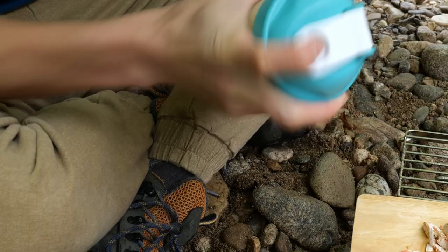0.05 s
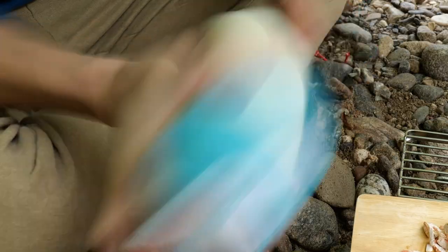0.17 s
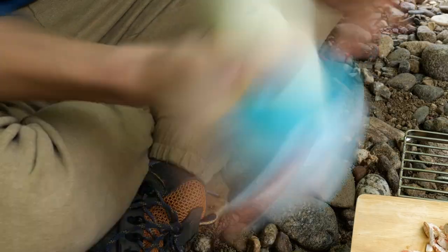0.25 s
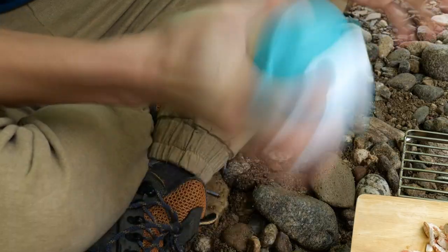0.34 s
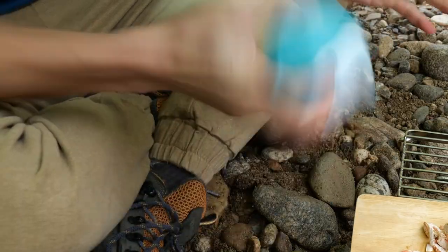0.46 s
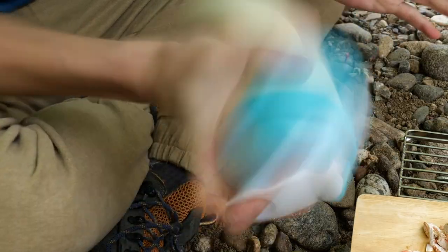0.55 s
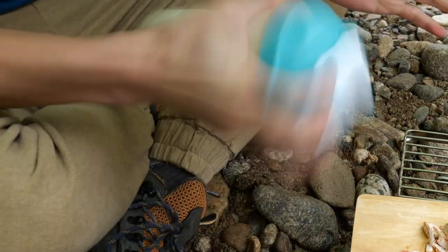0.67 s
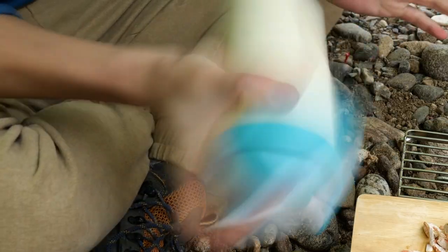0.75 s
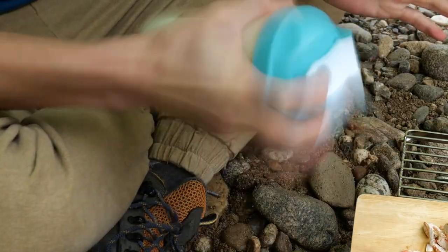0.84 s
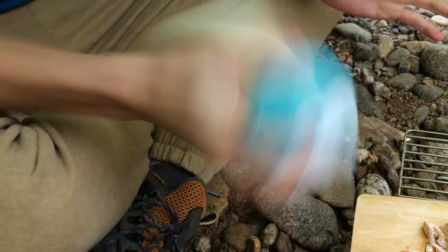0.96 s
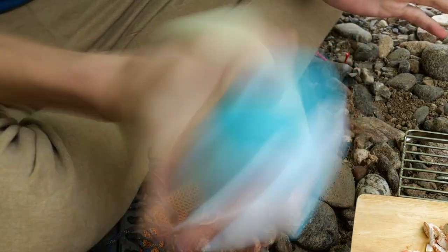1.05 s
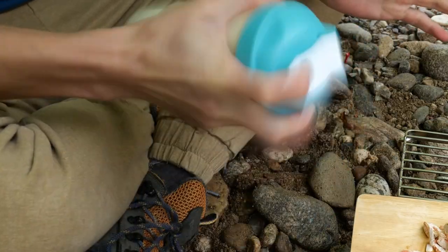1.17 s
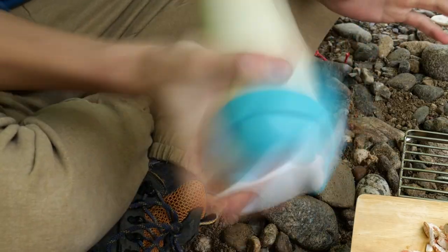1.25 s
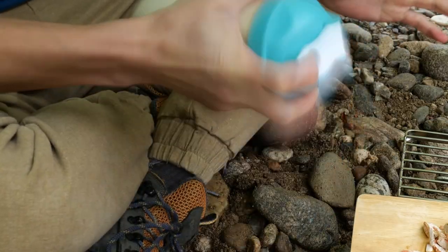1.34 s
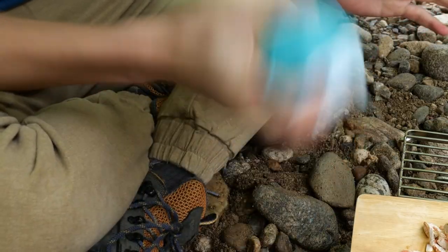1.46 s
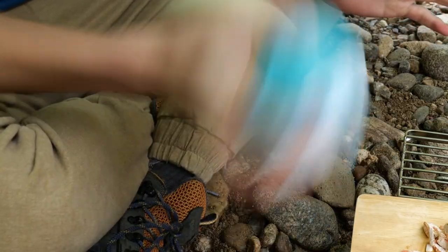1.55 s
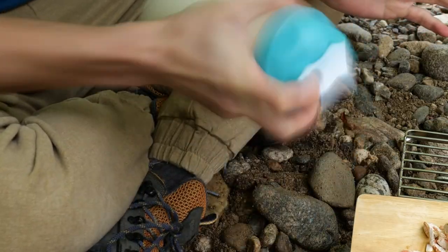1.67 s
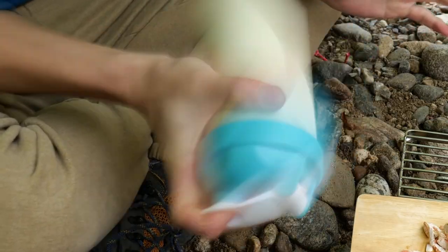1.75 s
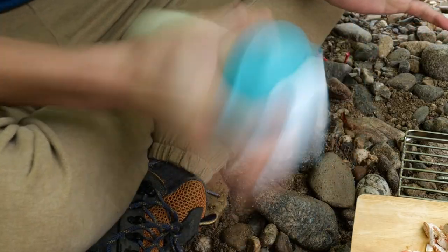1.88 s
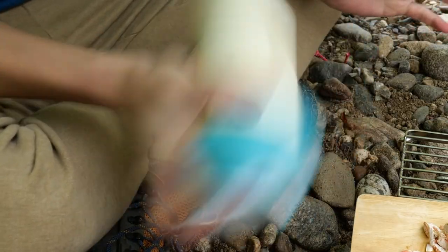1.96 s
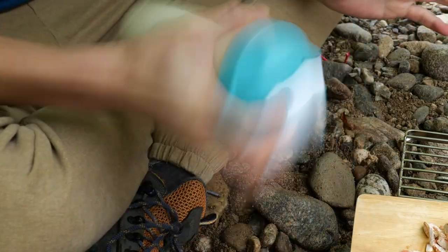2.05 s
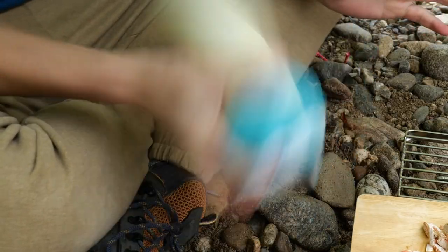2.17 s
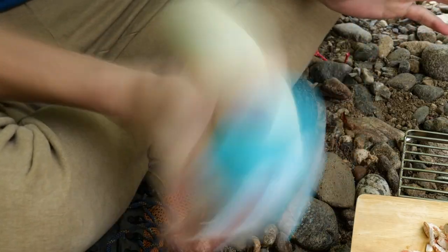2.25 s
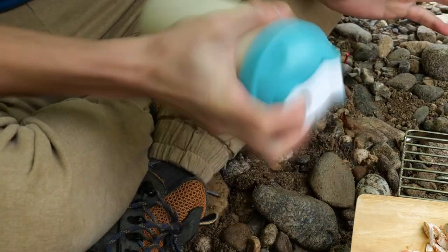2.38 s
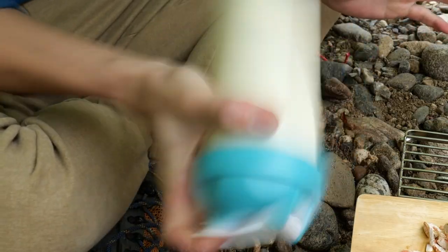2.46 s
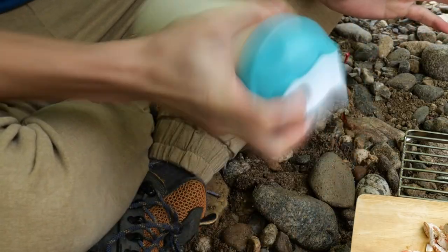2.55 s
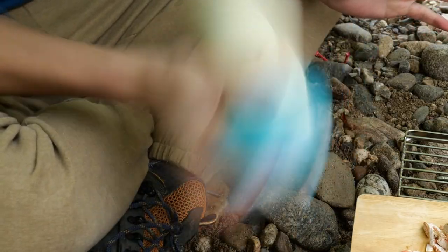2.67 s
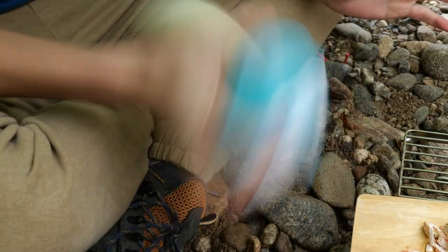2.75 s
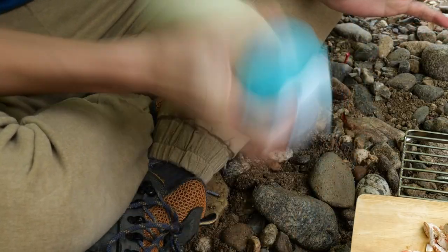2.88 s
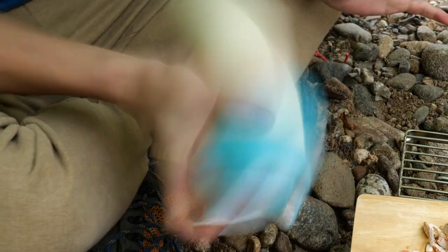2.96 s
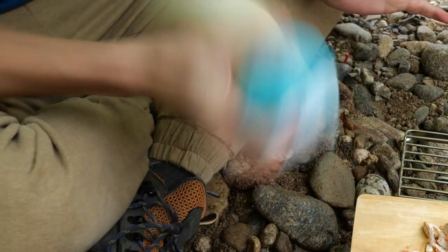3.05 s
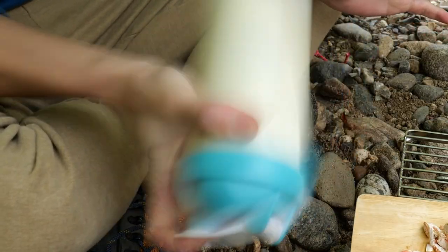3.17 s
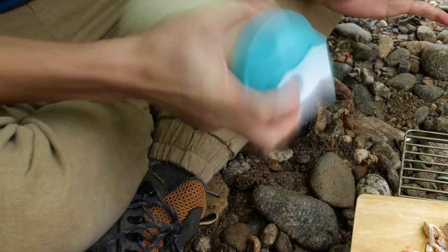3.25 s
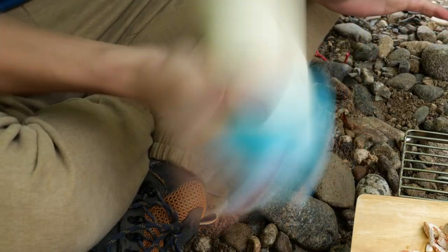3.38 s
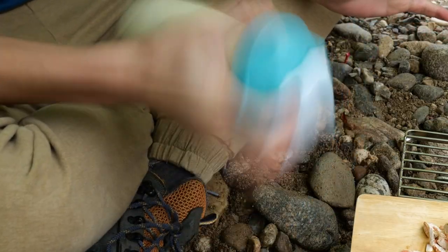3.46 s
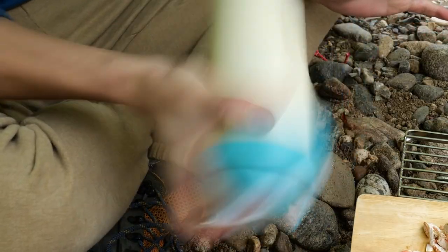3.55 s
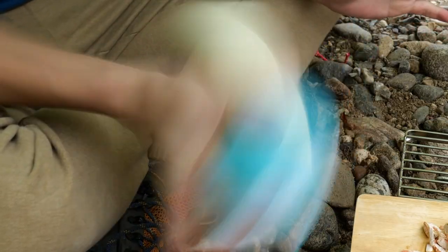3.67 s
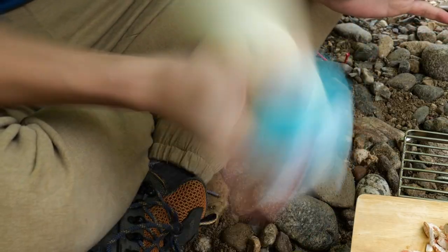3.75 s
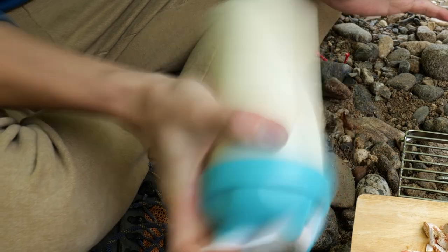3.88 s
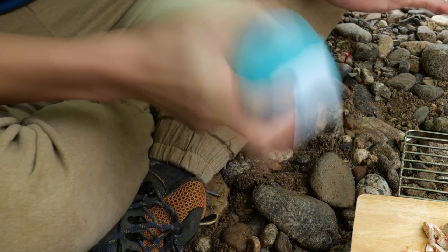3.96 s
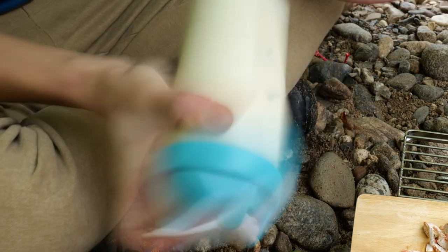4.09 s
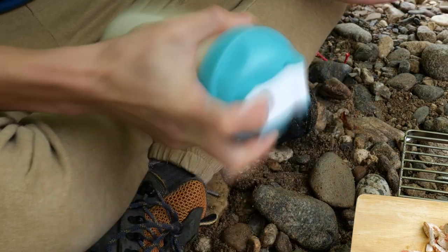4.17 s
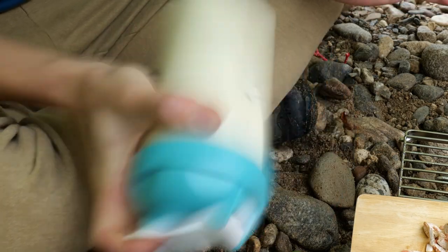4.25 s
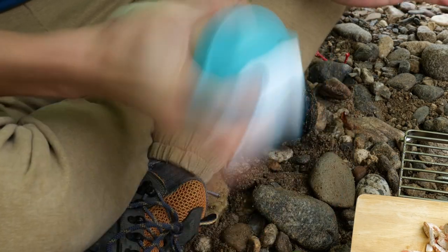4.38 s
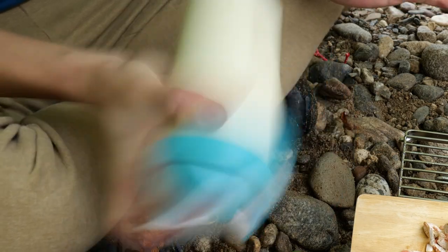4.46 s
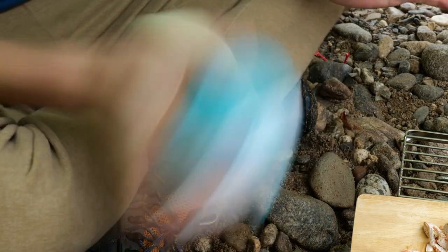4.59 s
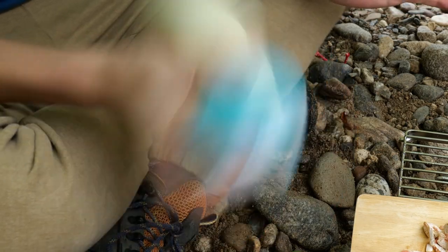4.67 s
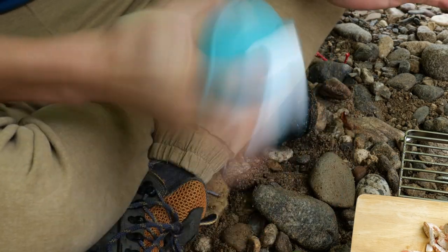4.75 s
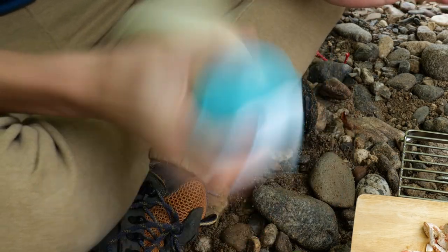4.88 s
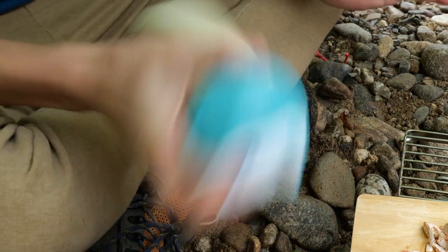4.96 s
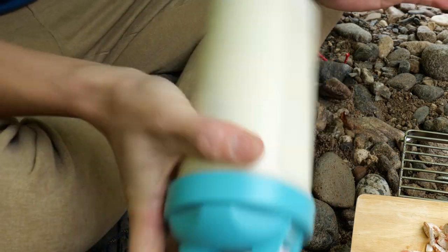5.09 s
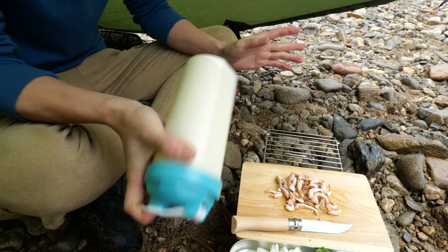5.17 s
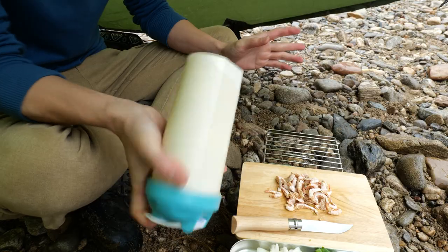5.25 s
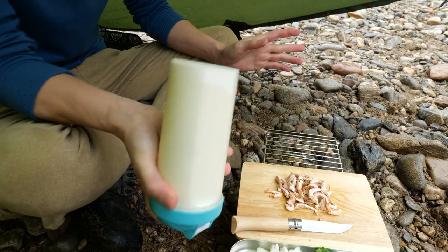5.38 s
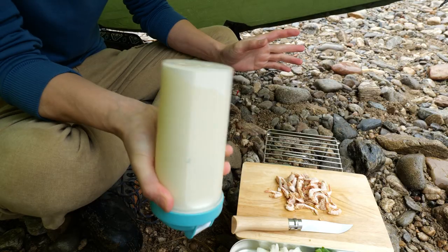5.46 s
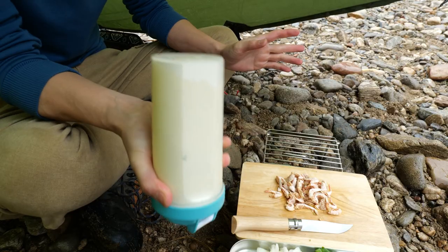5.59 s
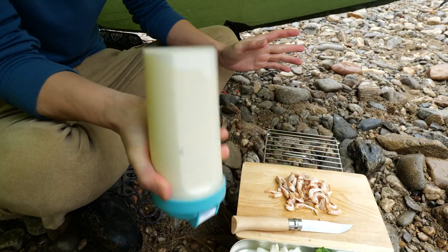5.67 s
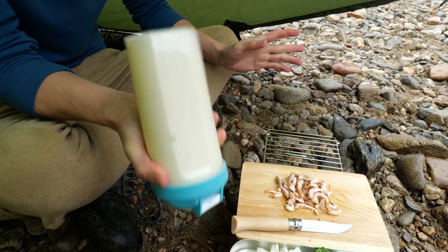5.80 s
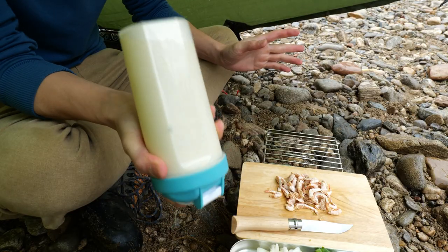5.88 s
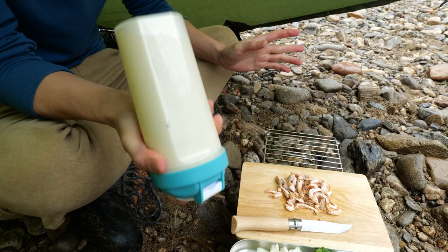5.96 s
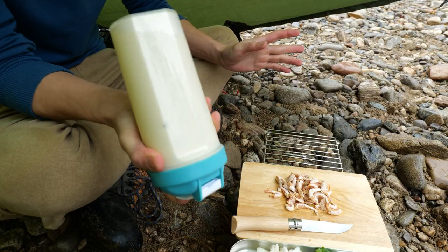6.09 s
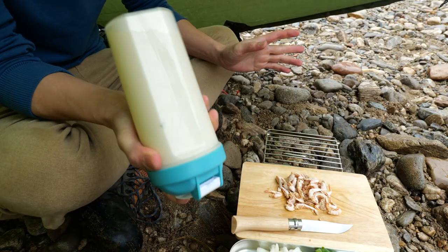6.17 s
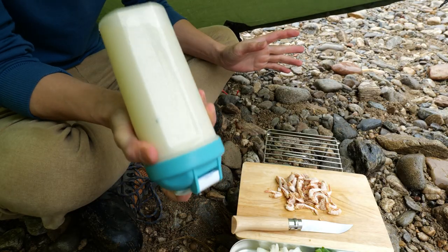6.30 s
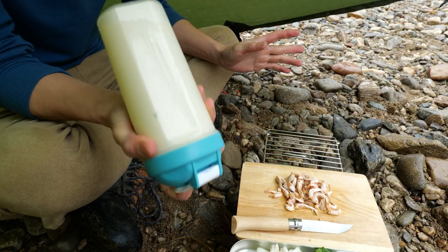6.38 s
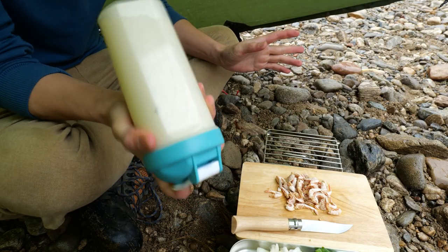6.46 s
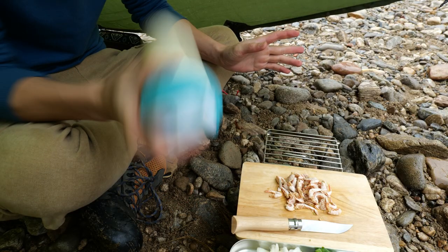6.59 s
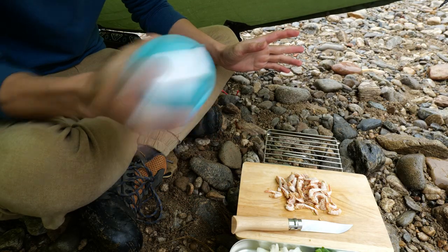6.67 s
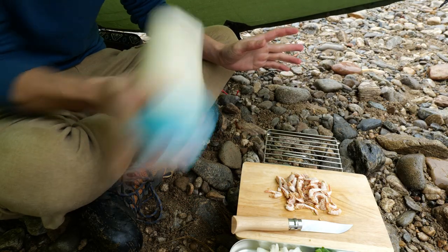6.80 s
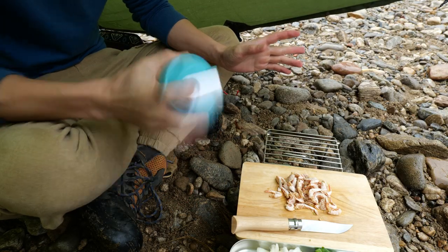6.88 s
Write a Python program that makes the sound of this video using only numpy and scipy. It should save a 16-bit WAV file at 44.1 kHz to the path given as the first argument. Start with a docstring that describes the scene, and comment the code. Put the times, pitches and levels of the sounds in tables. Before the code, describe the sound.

A plastic shaker bottle of creamy liquid is shaken hard close by, sloshing and rattling rapidly, then rests with faint drips before shaking restarts.

```python
"""Stony campsite: a plastic shaker bottle of creamy liquid is shaken hard by hand, close by.
Each stroke drives bubble clouds (damped sines plus noise) through the bottle: short throw, longer return.
Liquid, mixing ball and drips knock on the wall as noise slaps, wall modes and air-pocket tones.
The bottle rests with a few drips, then starts again.
Cloth rustle, a soft rumble, faint ground scatter, a far hiss and a low hum are shaped noise and a sine."""
import sys
import numpy as np
from scipy import signal
from scipy.fft import rfft, irfft
from scipy.io import wavfile
from scipy.ndimage import map_coordinates

SR = 44100
rng = np.random.default_rng(int(sys.argv[2]) if len(sys.argv) > 2 else 0)


def put_to_file(sound):
    """Save the sound as 16-bit audio at rate SR, in the file named by the first command-line argument."""
    columns = np.atleast_2d(sound).T  # one column per channel
    safe = np.clip(columns, -1, 1)
    whole_steps = np.round(safe * 32767)
    wavfile.write(sys.argv[1], SR, whole_steps.astype(np.int16))


N = 305613
TIME_S = np.arange(N) / SR

# far outdoor hiss: (frequency [Hz], relative density [dB per Hz])
OUTDOORS_SPECTRUM = [(15, -59), (25, -4), (58, -14), (92, -3), (145, -15), (229, -7), (285, -20.5),
                     (317, -17.5), (405, -13), (1890, -19), (5730, -24.5), (14400, -52), (16000, -55)]
# rubbing cloth: (frequency [Hz], relative density [dB per Hz])
SLEEVE_SPECTRUM = [(200, -35), (500, 5), (1500, 9.5), (5000, 6), (8600, -5), (15000, -38)]
# arm movement: (time [s], rustle level [dB])
ARM_LEVEL = [(0, -48), (5.0, -46), (5.4, -56), (6.53, -75), (6.57, -51.5), (6.65, -48), (6.77, -53.5),
             (6.93, -49)]
# liquid mass pushing the bottle: (frequency [Hz], relative density [dB per Hz])
HEAVE_SPECTRUM = [(15, -5.5), (30, 0.5), (100, -5), (190, -2.5), (400, -12.5), (1500, -79)]
# force of the strokes: (time [s], heave level [dB])
SHAKING_LEVEL = [(0, -68), (.3, -43.5), (3.0, -48.5), (4.9, -46.5), (5.15, -67), (6.6, -68.5), (6.93, -41)]
# strokes: (throw time [s], throw level [dB], return time [s], return length [s], return level [dB])
STROKES = [(0.19, -58, 0.249, 0.036, -31.5), (0.348, -27, 0.417, 0.05, -24),
           (0.495, -25, 0.56, 0.09, -24.5), (0.692, -24.5, 0.755, 0.079, -24.5),
           (0.862, -25, 0.917, 0.063, -21.5), (1.017, -25.5, 1.092, 0.062, -22.5),
           (1.202, -25.5, 1.264, 0.065, -25), (1.378, -28, 1.431, 0.055, -23.5),
           (1.533, -25.5, 1.607, 0.089, -25), (1.722, -23.5, 1.768, 0.085, -24.5),
           (1.89, -24, 1.96, 0.063, -25.5), (2.07, -23, 2.129, 0.054, -21.5),
           (2.235, -27, 2.303, 0.059, -22.5), (2.427, -25.5, 2.494, 0.042, -20),
           (2.589, -24, 2.668, 0.043, -19.5), (2.766, -24.5, 2.832, 0.069, -23.5),
           (2.934, -23, 3.002, 0.075, -23.5), (3.124, -26, 3.19, 0.064, -22.5),
           (3.301, -23, 3.381, 0.061, -22.5), (3.481, -22, 3.55, 0.074, -24.5),
           (3.663, -21.5, 3.739, 0.056, -24.5), (3.838, -23.5, 3.91, 0.069, -24),
           (4.028, -21.5, 4.09, 0.096, -24), (4.207, -24.5, 4.281, 0.06, -20),
           (4.392, -23, 4.48, 0.079, -27), (4.584, -23.0, 4.652, 0.062, -21.0),
           (4.768, -25.5, 4.846, 0.059, -21), (4.935, -29.5, 4.98, 0.029, -29.5),
           (6.665, -61, 6.718, 0.025, -46), (6.785, -32.5, 6.861, 0.1, -32.5)]
# colour and fading of each surge: (gurgle re splash [dB], spray re splash [dB], fade [dB per s])
THROW_SHAPE = (-8, -5, 28)
RETURN_SHAPE = (-6, -1.2, 25)
# froth colour: (gurgle [dB], splash [dB], spray [dB])
FROTH_TONE_DB = (-2.5, 0, -3.5)
# bubbles through the wall: (frequency [Hz], relative density [dB per Hz])
SLOSH_SPECTRUM = [(30, -38.5), (115, -14), (300, -7), (540, -3), (1500, 2.5), (2400, -2), (3060, -1),
                  (3800, -3), (4750, -8.5), (5250, -7.5), (6000, -19.5), (8000, -23.5), (10200, -32.5),
                  (13000, -69)]
# finest spray: (frequency [Hz], relative density [dB per Hz])
MIST_SPECTRUM = [(3000, -19), (6500, 4), (8500, -0.5), (10500, -13), (12500, -25), (15000, -38)]
# liquid slapping plastic: (frequency [Hz], relative density [dB per Hz])
SLAP_SPECTRUM = [(40, -24), (140, -10), (300, -3), (1400, 0.5), (3200, -7.5), (5400, -7), (6200, -18.5),
                 (8500, -17), (11000, -33), (15000, -57)]
# bottle wall modes: (frequency [Hz], relative level [dB], t60 [s])
WALL_MODES = [(2770, -1.5, 0.015), (3064, 1.5, 0.024), (3264, 1, 0.021), (3527, -3.5, 0.036),
              (3950, -1, 0.024), (4470, 4.5, 0.011), (5205, -5.5, 0.033), (7160, -12, 0.05),
              (8250, -25, 0.012)]
# clearest knocks of liquid, ball and drips:
# (time [s], thud [dB], slap [dB], wall ring [dB], air pocket [Hz], most excited wall frequency [Hz])
KNOCKS = [(0.095, -31.5, -47, -49, 332, 4320), (0.194, -62, -41, -37, 870, 3940),
          (0.255, -17.5, -12, -16.5, 1480, 3080), (0.2762, -22, -37, -30.5, 302, 3000),
          (0.3491, -20.5, -15.5, -17.5, 306, 3390), (0.4503, -21.5, -23.0, -36, 478, 2700),
          (0.585, -31, -36, -25, 1450, 3060), (0.5889, -35, -33, -9, 1660, 3090),
          (0.7037, -29, -21.5, -31, 1420, 3430), (0.7402, -19.5, -14, -27, 1150, 2860),
          (0.8603, -25, -20.5, -19.5, 1320, 2670), (0.8793, -30, -18, -39, 766, 3300),
          (0.961, -25.5, -12, -7.5, 537, 3240), (1.0348, -22.5, -14.5, -51, 1270, 3100),
          (1.093, -53, -19, -40, 1478, 3720), (1.219, -25.5, -19, -24.5, 1370, 3970),
          (1.38, -24, -17, -24, 1300, 2780), (1.434, -45.5, -24.5, -23, 1710, 3250),
          (1.552, -29, -16.5, -20.5, 1490, 2900), (1.6546, -31, -26.5, -14.5, 1620, 3180),
          (1.6616, -40, -22.5, -15.0, 1560, 5280), (1.7258, -18.5, -17, -28.5, 758, 2680),
          (1.774, -32, -17.5, -21, 1780, 3520), (1.893, -23, -20, -28.5, 1340, 2660),
          (1.904, -23, -11.5, -28, 1320, 2710), (2.0157, -29.5, -23.5, -13.5, 1540, 5140),
          (2.0248, -31.0, -18.5, -28, 1810, 3030), (2.1315, -39, -15.5, -23, 2078, 3310),
          (2.1813, -25.5, -21, -13.5, 1940, 3020), (2.2682, -29, -19.5, -38, 1320, 2650),
          (2.3464, -20, -18.5, -22.5, 520, 3450), (2.3765, -37.0, -23, -22.5, 960, 3120),
          (2.4317, -24.5, -14.5, -21, 1320, 3610), (2.6052, -19, -20.0, -22.5, 674, 2660),
          (2.6167, -24, -16.5, -26.0, 1440, 2660), (2.6785, -43, -21, -24, 1720, 3010),
          (2.7051, -20, -11, -10, 1190, 3030), (2.7796, -19, -12, -19, 990, 3290),
          (2.881, -23.5, -18.5, -10.5, 2020, 2960), (2.9552, -32.0, -19, -41, 1320, 2800),
          (3.0041, -46, -25.5, -18.5, 1560, 3140), (3.1971, -36.5, -43, -17.0, 1100, 3130),
          (3.2253, -15, -23, -6, 700, 3290), (3.3954, -20.0, -17, -23.5, 570, 3550),
          (3.5, -26, -16.5, -25, 1290, 2970), (3.5906, -12, -27, -23, 468, 3000),
          (3.595, -16.5, -12, -8.5, 533, 3000), (3.674, -46, -20.5, -35, 945, 2810),
          (3.8242, -30, -24, -22, 1366, 4880), (3.8448, -21.5, -18, -24.0, 1720, 2800),
          (3.9232, -33, -17.0, -23, 910, 3260), (3.9424, -31.5, -27, -22, 1890, 4200),
          (4.0281, -44, -24, -40, 1410, 3080), (4.0375, -26, -20, -26, 1370, 3000),
          (4.1017, -46.0, -20, -25, 1390, 3150), (4.2108, -37.5, -22.5, -33, 1332, 3380),
          (4.2943, -22, -28, -18.5, 1080, 3130), (4.302, -17, -12.0, -15.5, 590, 3070),
          (4.325, -18.5, -17.5, -11.5, 940, 3630), (4.4251, -27, -15.5, -21, 1080, 3610),
          (4.4757, -43, -27, -15.5, 1160, 3070), (4.6652, -35, -15.5, -31, 1840, 2680),
          (4.6762, -21, -30, -20.5, 543, 3100), (4.773, -32, -18.5, -19, 1355, 3150),
          (4.8589, -25, -18, -17, 1690, 3110), (4.9836, -41, -19.5, -28, 1420, 3640),
          (5.0004, -35.5, -25, -34, 2090, 3700), (5.0368, -56.5, -31.5, -29, 1400, 2690),
          (5.223, -43.5, -38, -36, 1480, 4220), (5.3, -50, -46, -46.5, 2080, 3270),
          (5.8522, -45.0, -41.5, -48.5, 830, 2600), (6.0007, -52.0, -44.5, -50.0, 1000, 2630),
          (6.1058, -52, -46.5, -57, 1400, 2780), (6.1998, -52.5, -43.5, -51, 880, 4690),
          (6.343, -48, -44, -57, 1140, 3810), (6.7336, -41, -36.5, -45.0, 1720, 2820),
          (6.7475, -53, -45.0, -31, 2010, 4220), (6.802, -46, -30.5, -23.5, 2380, 3490),
          (6.819, -22.5, -25.5, -36.5, 940, 2940), (6.8802, -23, -18.5, -50, 1110, 4150),
          (6.8939, -23.5, -25, -21, 348, 3170)]
# lesser knocks' colour: (thud [dB], slap [dB], ring [dB])
RATTLE_TONE_DB = (-11.5, -5, -9.5)
# stereo width: (frequency [Hz], side re mid [dB])
WIDTH = [(60, -20.5), (200, -27.5), (500, -27.5), (1500, -38), (4000, -33), (8000, -24), (14000, -21)]

BAND_EDGES_HZ = (800, 2400)
TOP_HZ = 16300
HISS_DB, HUM_DB, HUM_HZ = -50.0, -63, 91.5
DIFFUSE_DB = -24.5  # inter-channel part re outdoors
STONES_DB = -23.5  # re bottle
USUAL_DB = -24  # ordinary surge
THROW_S = 0.04536
SPRAY_GROWS_DB_PER_DB = 0.079  # extra spray per dB of surge above USUAL_DB
FROTH_DB, FROTH_HOLD_S, FROTH_FALL_S = -8, 0.0358, 0.012  # froth moves on after each surge
MIST_DB = -37.0
DROP_RATE_PER_S, DROP_DB, DROP_RANGE_DB = 45, -11, 8.5  # DROP_DB re spray
RATTLE_MAX_PER_S, RATTLE_DB, RATTLE_SCATTER_DB = 15, 4.5, 1.5  # RATTLE_DB re splash
RATTLE_POCKET_HZ, POCKET_SCATTER_OCT = 1330, 0.4
RATTLE_RING_HZ, RING_SCATTER_OCT = 3320, 0.2


def amp(db):
    """Decibels to gain."""
    return 10 ** (np.asarray(db) / 20)


def unit(x):
    """Scale to rms 1."""
    return x / np.sqrt(np.mean(x ** 2, axis=-1, keepdims=True) + 1e-20)


def add(track, start_s, sound):
    """Mix a sound into a track at a given time."""
    start = max(0, round(start_s * SR))
    part = track[start:start + len(sound)]
    part += sound[:len(part)]


def wobble(rate_hz):
    """Smooth random curve with rate_hz knots per second."""
    knots = rng.standard_normal(int(N * rate_hz / SR) + 4)
    return map_coordinates(knots, [TIME_S * rate_hz])


def level_curve(points):
    """Gain over time from (time [s], level [dB]) points."""
    return amp(np.interp(TIME_S, *np.transpose(points)))


def spectrum_gain(points, size):
    """Gain per FFT bin from (frequency [Hz], level [dB]) points, linear over log frequency."""
    hz, db = np.transpose(points)
    return amp(np.interp(np.log(np.fft.rfftfreq(size, 1 / SR) + 1), np.log(hz), db))


def colour(x, points, size=2048):
    """Minimum-phase filter through (frequency [Hz], level [dB]) points."""
    cepstrum = irfft(np.log(spectrum_gain(points, size)))
    # fold to causal
    cepstrum[1:size // 2] *= 2
    cepstrum[size // 2 + 1:] = 0
    impulse = irfft(np.exp(rfft(cepstrum)))
    return signal.fftconvolve(x, impulse)[:len(x)]


def passband(x, hz, kind, order=3):
    """Butterworth filter."""
    return signal.sosfilt(signal.butter(order, hz, kind, fs=SR, output="sos"), x)


def registers(x):
    """Low, middle and high part of a sound."""
    low_hz, high_hz = BAND_EDGES_HZ
    low = passband(x, low_hz, "lowpass")
    middle = passband(x, (low_hz, high_hz), "bandpass")
    high = passband(x, high_hz, "highpass")
    return low, middle, high


def gate(t, length_s, rise_s, fall_s):
    """Attack, hold and release from time 0."""
    opening = (1 + np.tanh(t / rise_s)) / 2
    closing = (1 - np.tanh((t - length_s) / fall_s)) / 2
    return opening * closing


def outdoors():
    """Steady far hiss as shaped noise; low hum as a sine wavering in phase and level."""
    flicker = amp(0.38 * wobble(29) + 2.7 * np.tanh(wobble(77)))
    hiss = unit(colour(rng.standard_normal(N), OUTDOORS_SPECTRUM, size=8192)) * flicker
    phase = 2 * np.pi * HUM_HZ * TIME_S + 1.8 * wobble(9.1)
    hum = unit(np.sin(phase) * amp(3 * wobble(4)))
    return amp(HISS_DB) * hiss + amp(HUM_DB) * hum


def stones(x, t60_s, size=8000):
    """Scatter from stony ground and tarp: dull decaying noise tail, starting after 3 ms."""
    t = np.arange(size) / SR
    noise = passband(rng.standard_normal(size), 4700, "lowpass", order=1)
    tail = noise * amp(-60 * t / t60_s) * (t > .003)
    return signal.fftconvolve(x, tail / np.linalg.norm(tail))[:N]


def sleeve():
    """Cloth friction: shaped noise, loud as the arm slows down and swings up again."""
    rub = unit(colour(rng.standard_normal(N), SLEEVE_SPECTRUM) * amp(3.7 * wobble(90)))
    return level_curve(ARM_LEVEL) * rub


def heave():
    """The swinging liquid mass rumbles softly under the strokes: low shaped noise."""
    rumble = unit(colour(rng.standard_normal(N), HEAVE_SPECTRUM) * amp(0.78 * wobble(22)))
    return level_curve(SHAKING_LEVEL) * rumble


def drops(spray, t60_s, count=600):
    """Drops flung with the spray tick sharply on the wall: short noise decays."""
    when, size, luck = rng.random((count, 3)).T
    lands = luck < DROP_RATE_PER_S * N / SR / count
    impacts = np.bincount((when * N).astype(int), lands * amp(-DROP_RANGE_DB * size), N)
    t = TIME_S[:SR // 100]
    envelope = signal.fftconvolve(impacts, amp(-60 * t / t60_s))[:N]
    ticks = envelope * rng.standard_normal(N)
    return amp(DROP_DB) * spray * unit(colour(ticks, SLAP_SPECTRUM))


def surge_levels(rise_s, fall_s):
    """Gurgle, splash and spray gains: each surge sets in fast, fades and drains, leaving froth."""
    surges = []
    for throw_s, throw_db, return_s, return_length_s, return_db in STROKES:
        surges.append((throw_s, THROW_S, throw_db, THROW_SHAPE))
        surges.append((return_s, return_length_s, return_db, RETURN_SHAPE))
    power = np.zeros((3, N))
    for start_s, length_s, db, (gurgle_db, spray_db, fade_db_per_s) in surges:
        near = slice(max(0, int((start_s - .03) * SR)), int((start_s + .25) * SR))
        t = TIME_S[near] - start_s
        spray_db = spray_db + SPRAY_GROWS_DB_PER_DB * (db - USUAL_DB)
        tone = amp([[gurgle_db], [0], [spray_db]])
        fade = amp(-fade_db_per_s * (t - length_s / 2))
        surge = tone * gate(t, length_s, rise_s, fall_s) * fade
        froth_tone = amp(FROTH_DB) * amp(FROTH_TONE_DB)[:, None]
        froth = froth_tone * gate(t, length_s + FROTH_HOLD_S, rise_s, FROTH_FALL_S)
        power[:, near] += amp(db) ** 2 * (surge ** 2 + froth ** 2)
    return np.sqrt(power)


def bubbles(rate_per_s, low_hz, high_hz, cycles, range_db, size=700):
    """Bubble stream, rms 1: damped sines rising up to 8 % in pitch; smaller ones are shorter."""
    count = int(rate_per_s * N / SR)
    draw = rng.random((count, 4))
    hz = low_hz * (high_hz / low_hz) ** draw[:, :1]
    life_s = cycles * 2 ** (2 * draw[:, 1:2] - 1) / hz
    strength = amp(-range_db * draw[:, 2:3]) * hz
    t = np.arange(size) / SR
    age = t / life_s
    phase = 2 * np.pi * hz * t * (1 + 0.04 * np.minimum(age, 2))
    envelope = np.exp(-age) * (1 - np.exp(-2 * hz * t)) * (1 - (t / t[-1]) ** 2)
    ring = strength * envelope * np.sin(phase)
    where = (draw[:, 3:] * N).astype(int) + np.arange(size)
    return unit(np.bincount(where.ravel(), ring.ravel(), N + size)[:N])


def slosh(levels):
    """Big air pockets gurgle, middling ones splash, fine spray patters on the wall."""
    big = bubbles(rate_per_s=480, low_hz=213.4, high_hz=1027, cycles=1.28, range_db=4.5)
    medium = bubbles(rate_per_s=1000, low_hz=661, high_hz=2710, cycles=1.5, range_db=11)
    # a few whole bubbles ring longer
    glugs = bubbles(rate_per_s=55, low_hz=700, high_hz=2097, cycles=6.7, range_db=3.5)
    fine = bubbles(rate_per_s=2600, low_hz=1995, high_hz=11570, cycles=2.66, range_db=8.0)
    churn = amp([[-13], [-14], [-11]]) * rng.standard_normal((3, N))
    lumps_db = 4.8 * np.tanh(wobble(190))  # lumps of liquid hit one after another
    out = np.zeros(N)
    for index, cloud in enumerate((big, medium + amp(-5) * glugs, fine)):
        voice = registers(colour(cloud + churn[index], SLOSH_SPECTRUM))[index]
        flutter_db = 2.2 * np.tanh(wobble(80))
        out += levels[index] * unit(voice * amp(lumps_db + flutter_db))
    # hissing mist, mainly in the strongest surges
    mist = unit(colour(rng.standard_normal(N), MIST_SPECTRUM))
    mist_level = amp(MIST_DB) * (levels[2] / levels[2].max()) ** 1.1
    return out + mist_level * mist * amp(lumps_db)


def rattle(splash, count=200):
    """Lesser knocks fall at random inside the surges and follow the splash level; rows as in KNOCKS."""
    place, chance = rng.random((count, 2)), rng.standard_normal((count, 5))
    rows = []
    for (when, luck), scatter in zip(place, chance):
        strength = splash[int(when * N)]
        likelihood = RATTLE_MAX_PER_S * N / SR / count * min(1, strength / amp(USUAL_DB))
        if luck < likelihood:
            knock_db = 20 * np.log10(strength) + RATTLE_DB
            parts_db = knock_db + np.array(RATTLE_TONE_DB) + RATTLE_SCATTER_DB * scatter[:3]
            pocket_hz = RATTLE_POCKET_HZ * 2 ** (POCKET_SCATTER_OCT * scatter[3])
            ring_hz = RATTLE_RING_HZ * 2 ** (RING_SCATTER_OCT * scatter[4])
            rows.append((when * N / SR, *parts_db, pocket_hz, ring_hz))
    return rows


def knocks(blows, pocket_cycles, slap_t60_s, pocket_db, crack_db, focus_db, attack_s, lead_db, lead_s,
           size=3000):
    """Each knock slaps the wall, rings its modes at new strengths and sounds an air pocket."""
    out, t = np.zeros(N), np.arange(size) / SR
    blow = SR // 100  # 10 ms of samples: part levels are rms over this
    mode_hz, mode_db, mode_t60_s = np.transpose(WALL_MODES)[:, :, None]
    onset = 1 - np.exp(-t / attack_s)
    for start_s, thud_db, slap_db, ring_db, pocket_hz, ring_hz in blows:
        chance = rng.standard_normal((3, len(WALL_MODES), 1))
        # place of the blow favours some modes; liquid weight detunes them
        favour_db = focus_db * np.exp(-(np.log(mode_hz / ring_hz) / 0.15) ** 2)
        decay = amp(mode_db + favour_db + 2 * chance[0] - 60 * t / mode_t60_s)
        detuned_hz = mode_hz * (1 + 0.016 * chance[1])
        modes = decay * np.sin(2 * np.pi * detuned_hz * t + chance[2])
        wall = unit(onset * modes.sum(0))

        pocket_decay = np.exp(-t * pocket_hz / pocket_cycles - t / 0.0087)
        pocket = unit(onset * pocket_decay * np.sin(2 * np.pi * pocket_hz * t))
        burst = onset * rng.standard_normal(size) * amp(-60 * t / slap_t60_s)
        splat = unit(colour(burst, SLAP_SPECTRUM))
        # harder slaps trap more air
        thud, slap, _ = registers(splat + amp(pocket_db + 0.21 * slap_db) * pocket)
        thud = passband(thud, 119, "highpass", order=2)  # the thud carries no deep bass
        # the crack grows with the ring level, so harder knocks sound brighter
        crack = unit(registers(splat)[2])
        ring = wall + amp(crack_db + 0.069 * ring_db) * crack
        for part, db in ((thud, thud_db), (slap, slap_db), (ring, ring_db)):
            add(out, start_s, amp(db) * part / np.sqrt(np.mean(part[:blow] ** 2)))

        # ball drives liquid ahead of it: a short rush swells before it lands
        swell = np.exp(-t[:2 * blow][::-1] / lead_s)
        rush = unit(colour(rng.standard_normal(2 * blow), SLOSH_SPECTRUM)) * swell
        add(out, start_s - 2 * blow / SR, amp(ring_db + lead_db) * rush)
    return out


def scene():
    """Bottle straight ahead: channels differ by a slight phase turn and a little diffuse outdoors."""
    around = sleeve() + outdoors()
    diffuse = amp(DIFFUSE_DB) * outdoors()
    levels = surge_levels(rise_s=0.007, fall_s=0.015)
    liquid = slosh(levels) + heave()
    patter = drops(levels[2], t60_s=0.0049)
    blows = list(KNOCKS) + rattle(levels[1])
    hits = knocks(blows, pocket_cycles=4.8, slap_t60_s=0.028, pocket_db=8.0, crack_db=-4.0, focus_db=14,
                  attack_s=0.00029, lead_db=-13.0, lead_s=0.0092)
    bottle = liquid + patter + hits
    mid = bottle + amp(STONES_DB) * stones(bottle, t60_s=0.079) + around
    # 1j turns the phase by 90 degrees
    turned = irfft(1j * rfft(mid) * spectrum_gain(WIDTH, N), N)
    side = turned + diffuse
    return np.array([mid + side, mid - side])


def record(dry):
    """Clip at full scale, then keep nothing above the band limit."""
    clipped = np.clip(dry, -1, 1)
    return irfft(rfft(clipped) * (np.fft.rfftfreq(N, 1 / SR) < TOP_HZ), N)


dry = scene()
out = record(dry)
put_to_file(out)
```